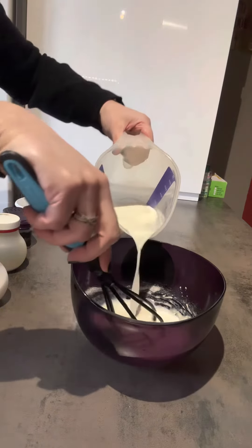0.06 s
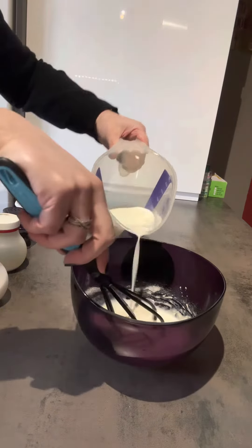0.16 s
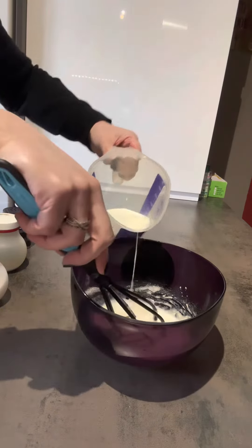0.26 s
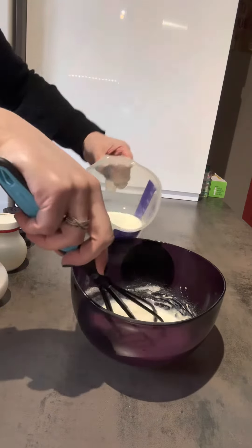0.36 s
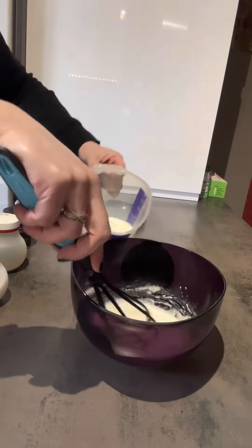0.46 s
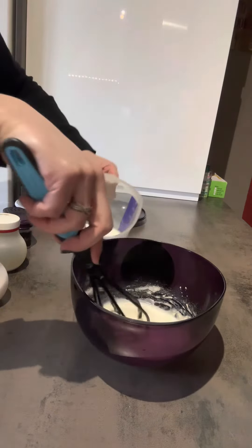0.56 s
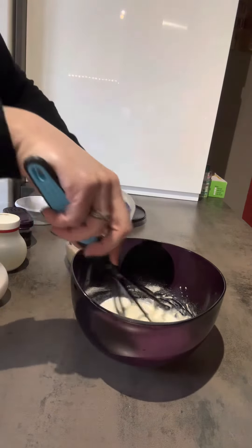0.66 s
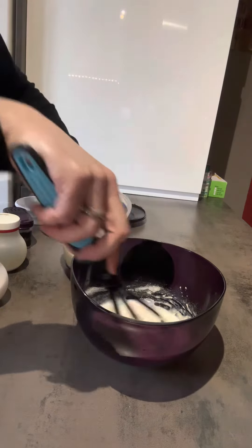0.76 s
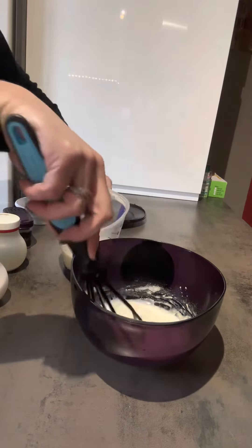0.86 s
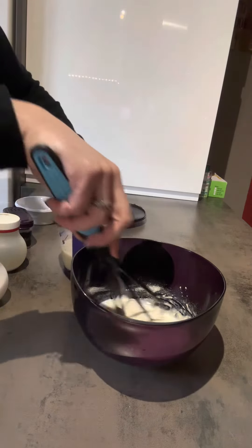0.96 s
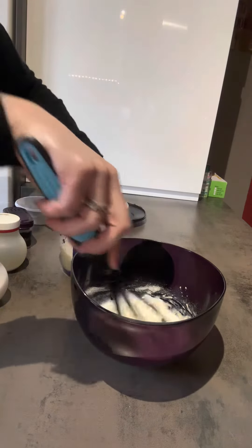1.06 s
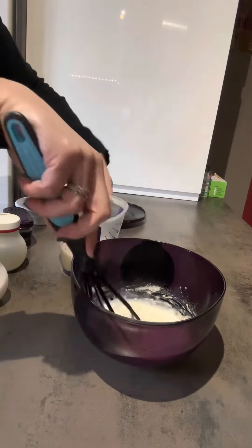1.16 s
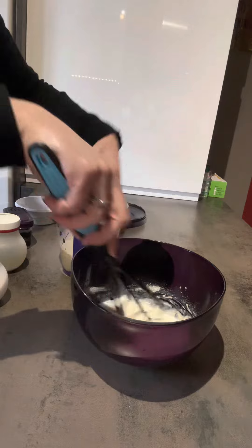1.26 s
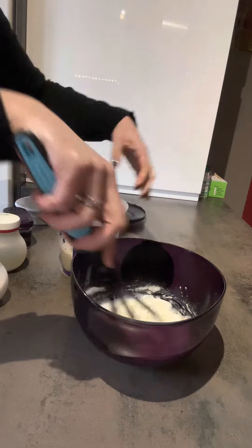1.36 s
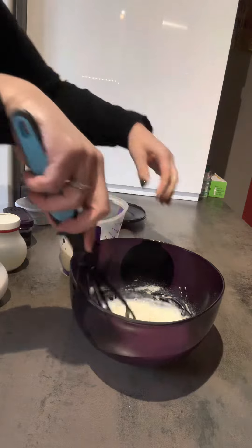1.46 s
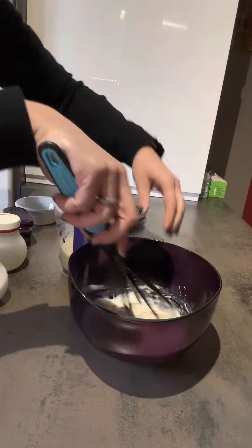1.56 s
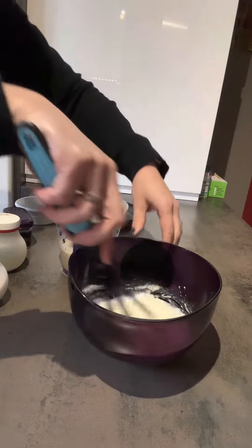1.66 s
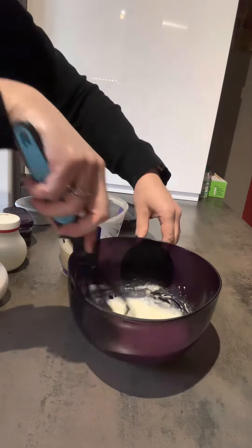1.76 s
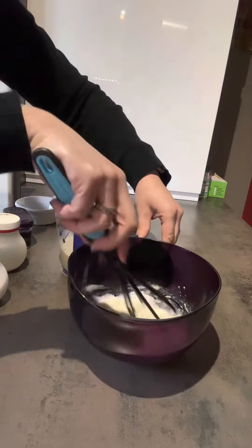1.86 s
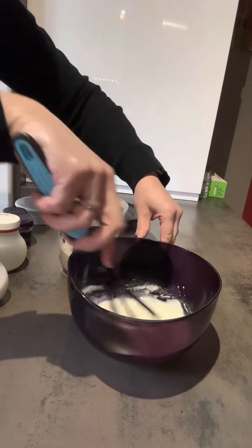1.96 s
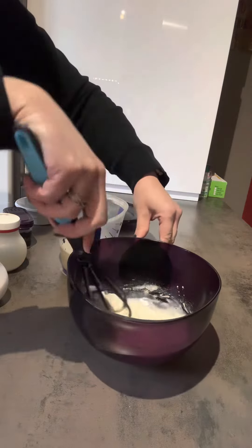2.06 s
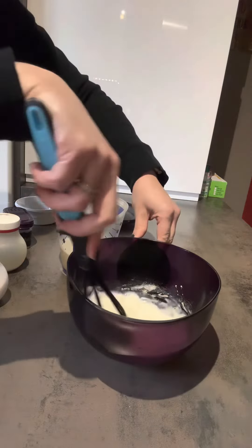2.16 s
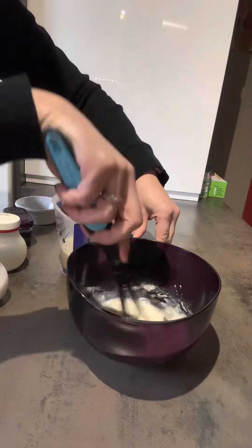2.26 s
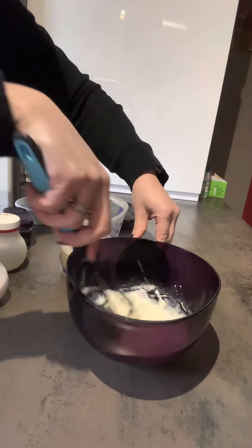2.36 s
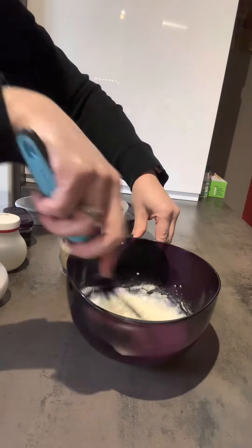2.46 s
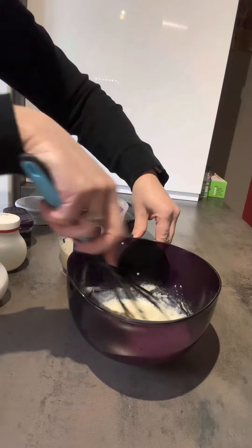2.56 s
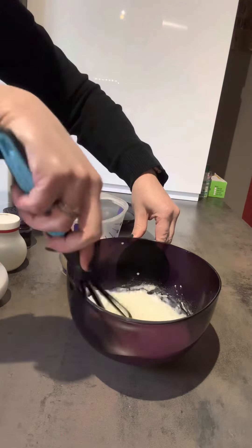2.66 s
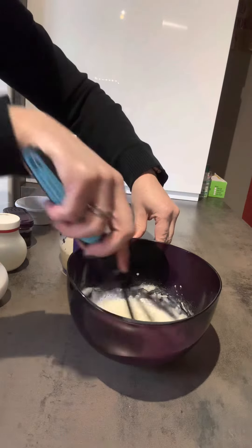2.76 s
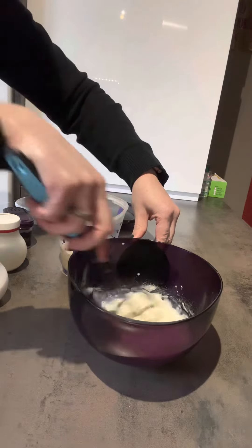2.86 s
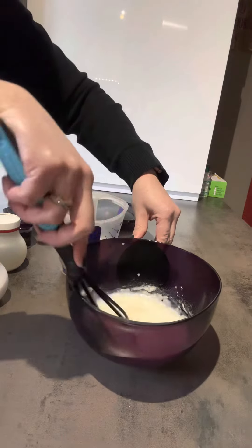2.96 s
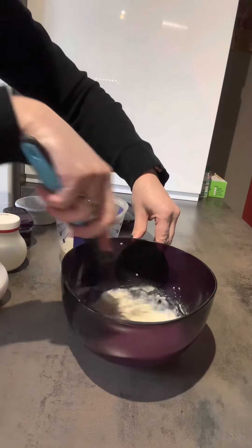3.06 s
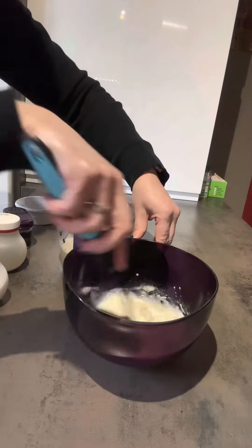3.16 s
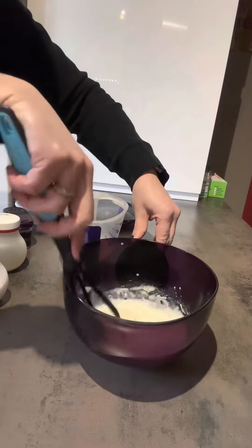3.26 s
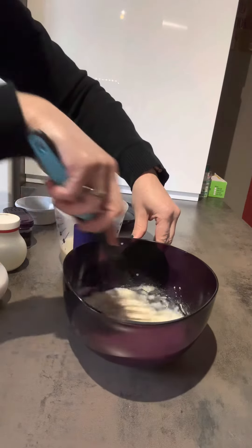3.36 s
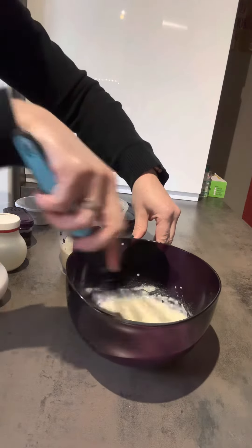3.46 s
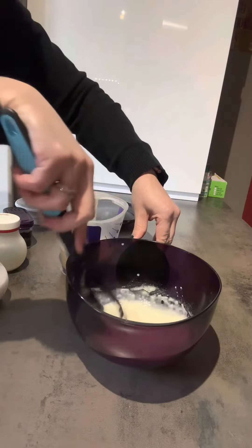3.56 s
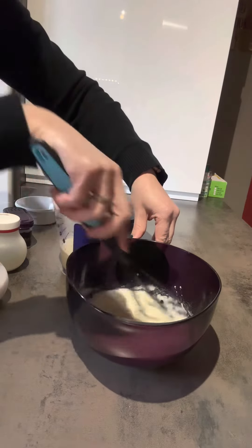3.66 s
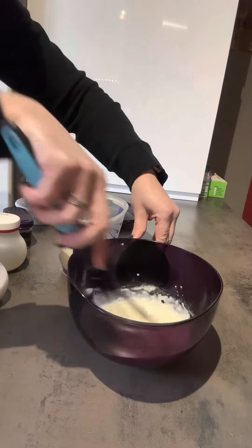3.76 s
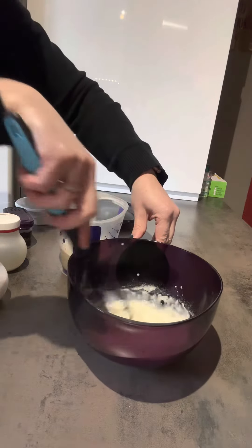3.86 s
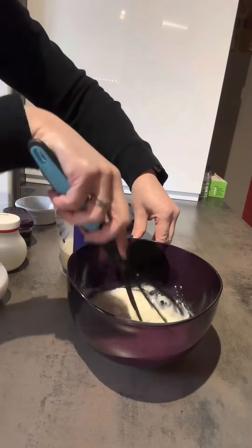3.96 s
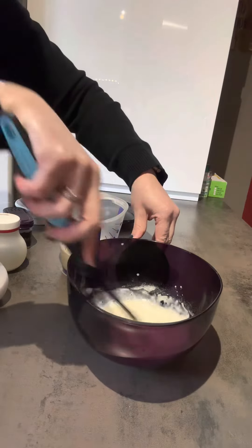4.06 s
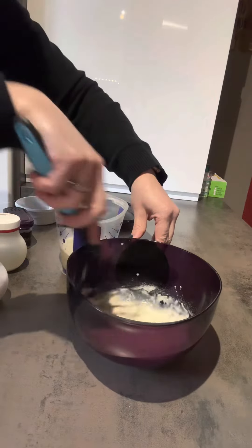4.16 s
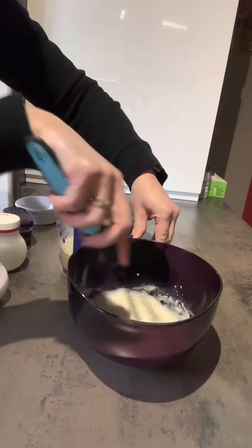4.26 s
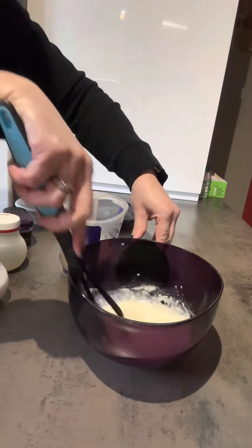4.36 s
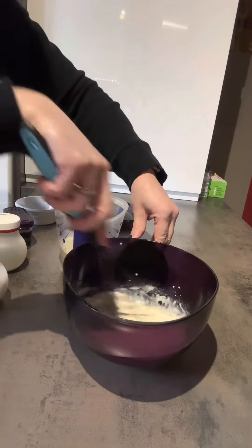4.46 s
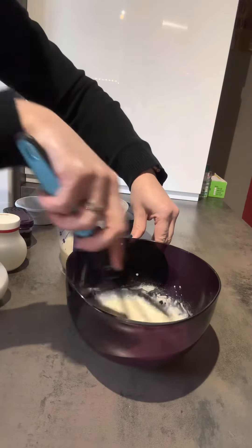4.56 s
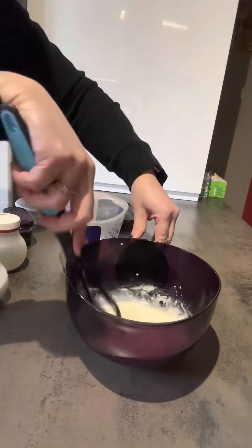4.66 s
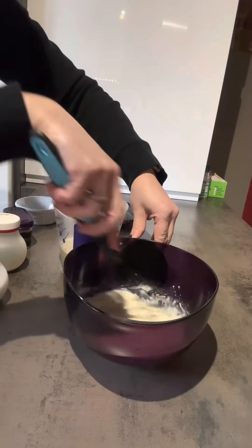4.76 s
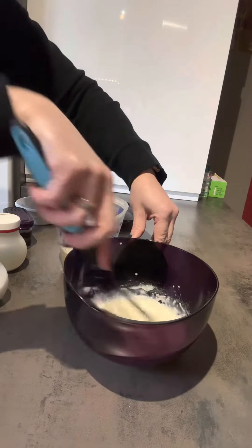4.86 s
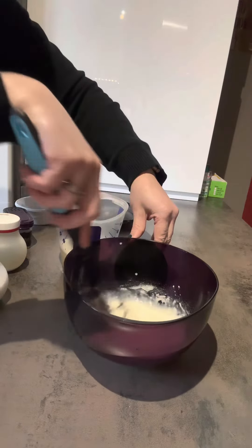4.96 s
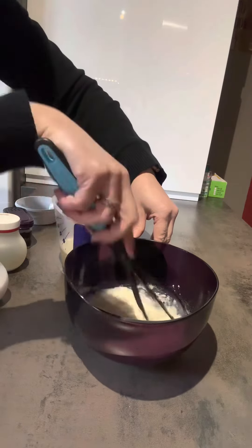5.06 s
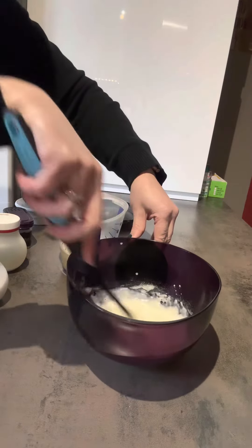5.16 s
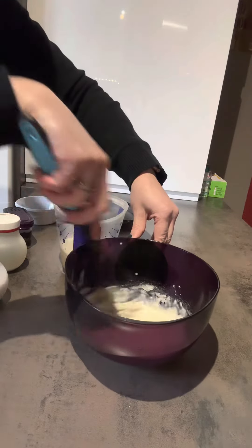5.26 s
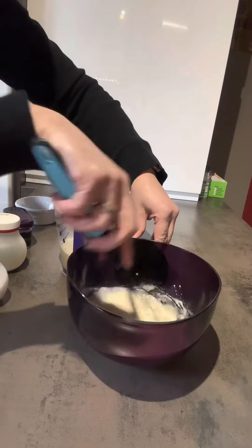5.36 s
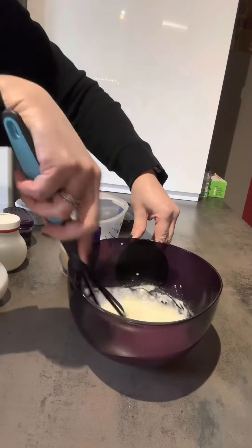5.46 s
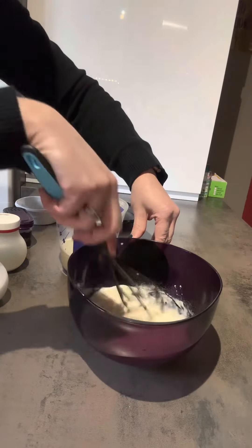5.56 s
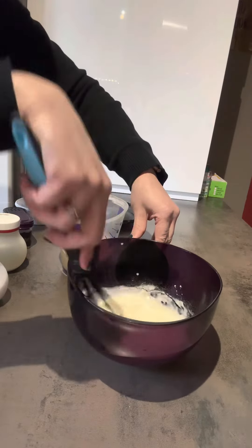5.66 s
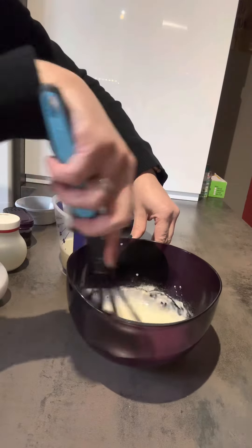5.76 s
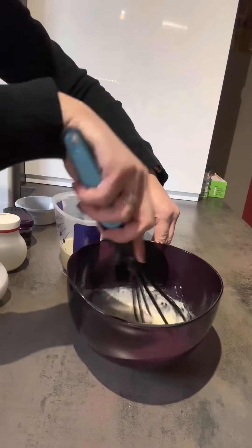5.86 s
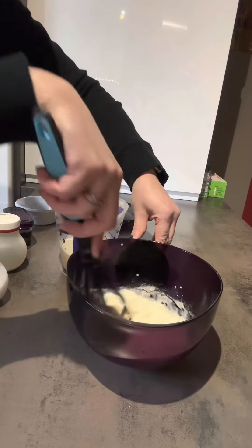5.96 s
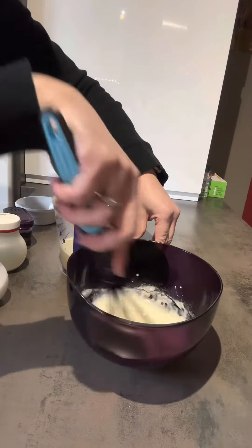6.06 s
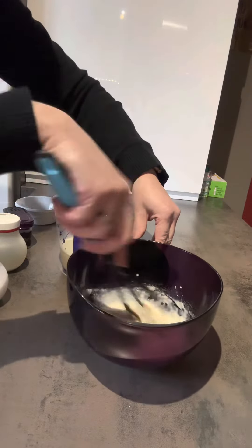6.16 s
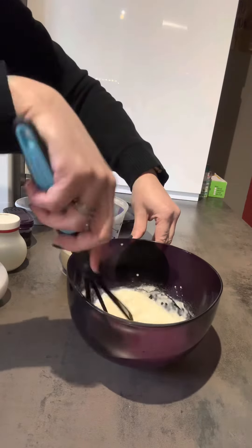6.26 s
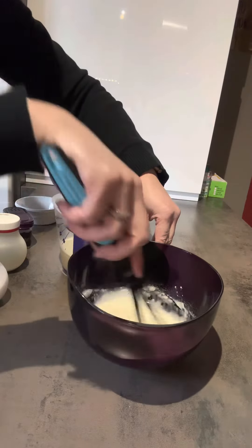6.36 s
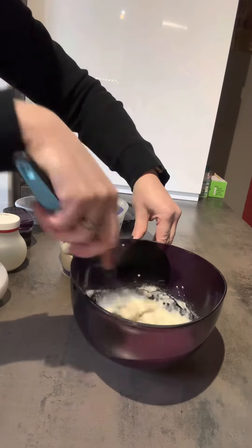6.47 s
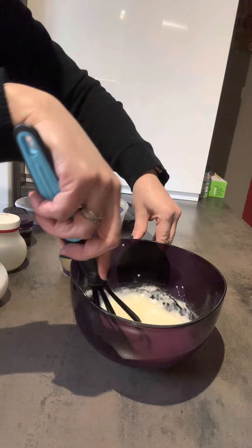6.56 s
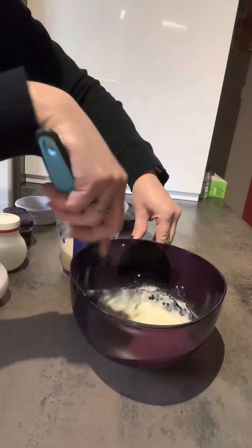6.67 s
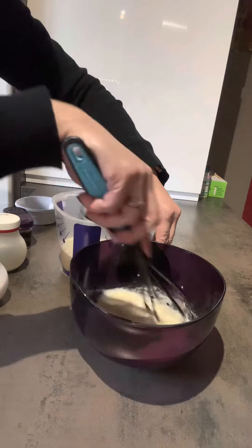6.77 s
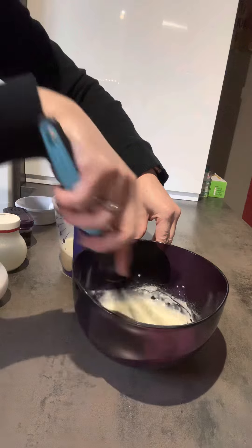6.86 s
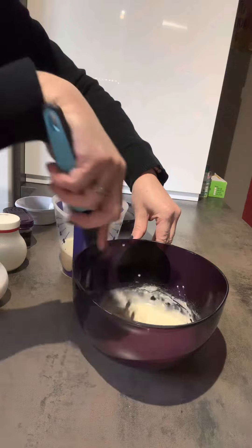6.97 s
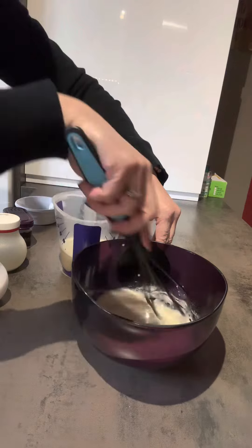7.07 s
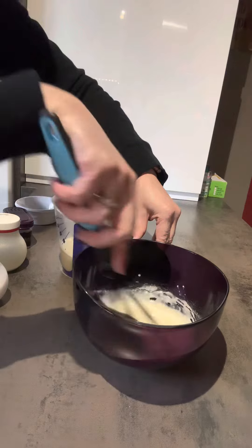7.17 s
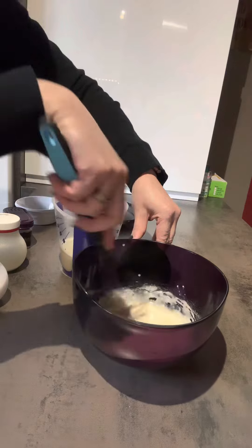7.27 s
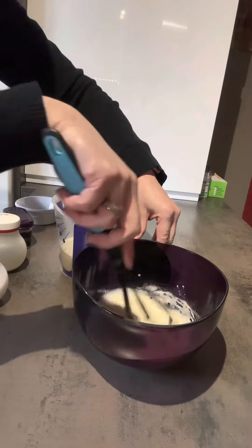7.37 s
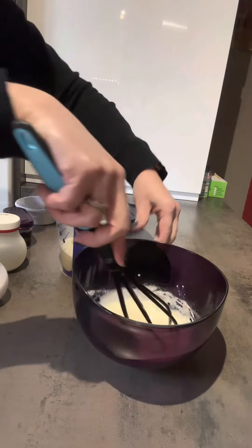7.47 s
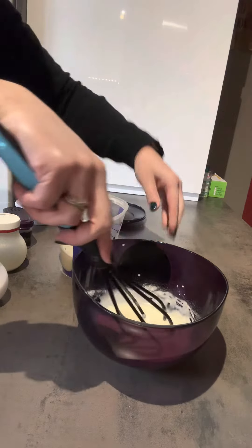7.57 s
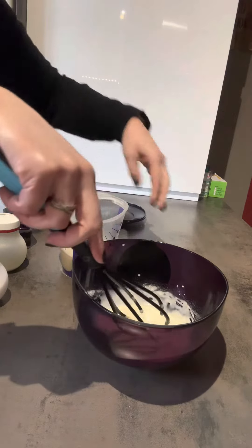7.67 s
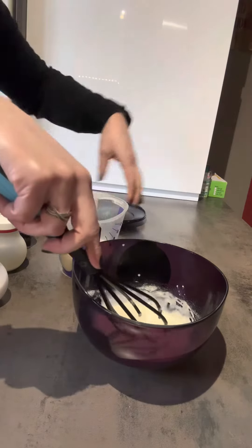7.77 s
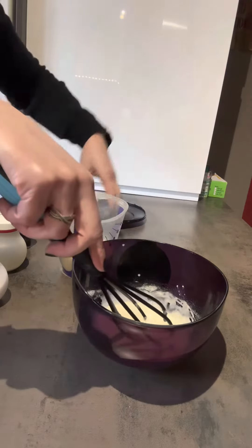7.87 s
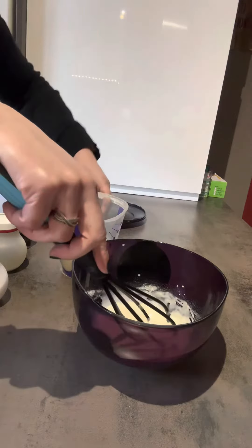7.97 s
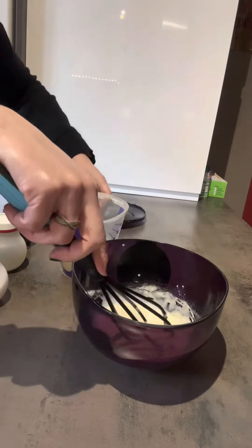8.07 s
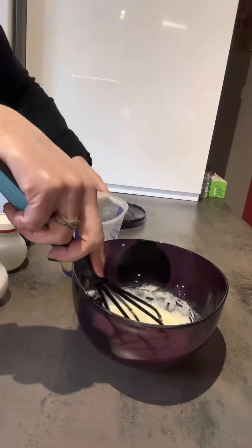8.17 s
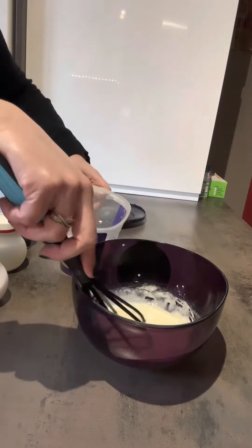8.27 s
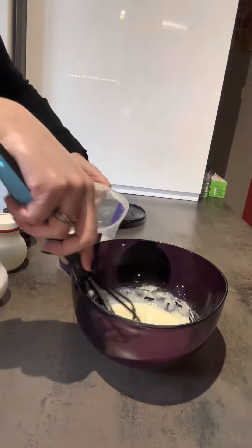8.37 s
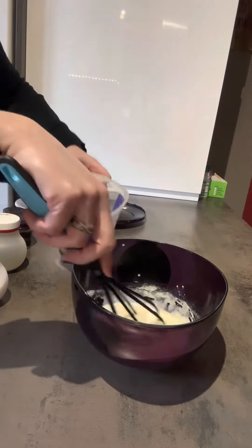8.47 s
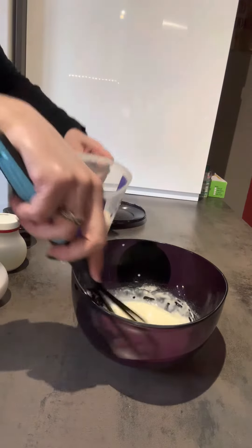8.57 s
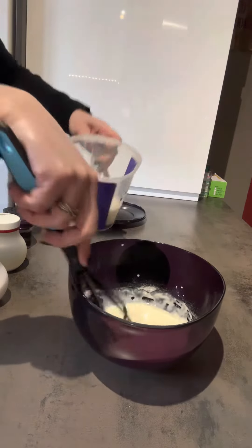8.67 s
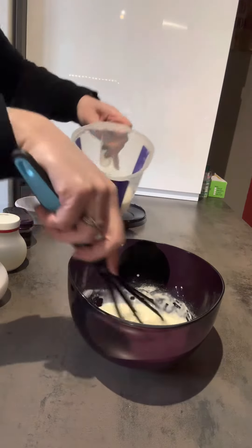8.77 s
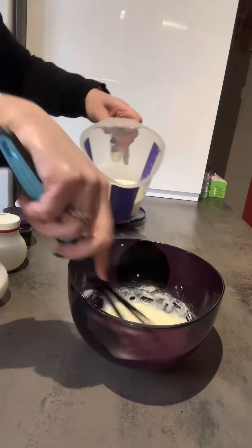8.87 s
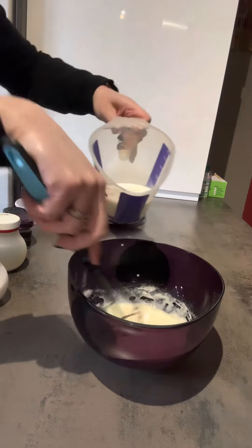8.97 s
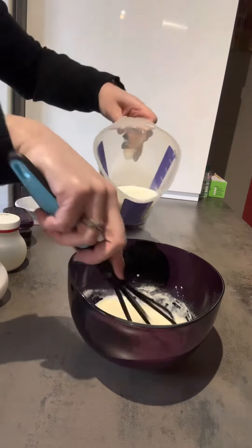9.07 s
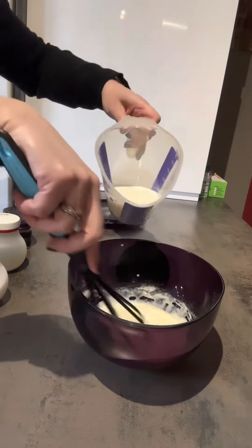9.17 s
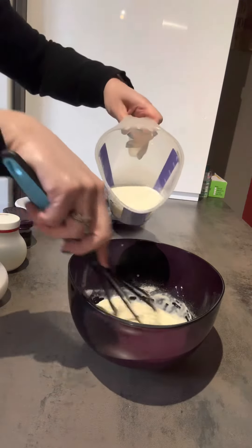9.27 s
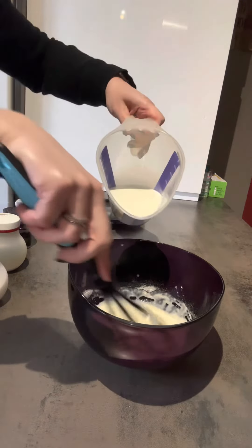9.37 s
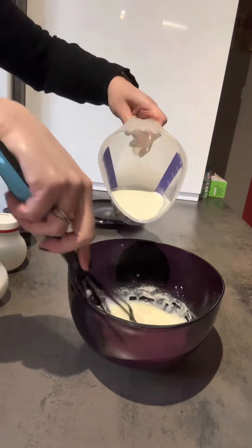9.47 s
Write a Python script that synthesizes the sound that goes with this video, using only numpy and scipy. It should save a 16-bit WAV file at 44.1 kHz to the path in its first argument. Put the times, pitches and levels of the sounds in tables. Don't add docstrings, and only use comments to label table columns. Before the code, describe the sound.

A close stereo microphone hears a wire whisk stirring cream in a plastic bowl. First a jug is put down, knocking twice, the second knock loudest. Slow light scraping turns into brisk rhythmic swishes with short squeaky metallic tones, hiss and dull bumps. After a short pause the jug scrapes and clacks away and gentle stirring resumes, over low fridge hum and a short room tail.

```python
import sys
import numpy as np
from scipy import signal
from scipy.fft import rfft, irfft, next_fast_len
from scipy.io import wavfile
from scipy.ndimage import uniform_filter1d

SR = 44100
rng = np.random.default_rng(int(sys.argv[2]) if len(sys.argv) > 2 else 0)


def convert_level_to_amplitude(level_db):
    exponent = np.asarray(level_db, float) / 20
    return 10 ** exponent


def master(y):
    cut = np.clip(np.atleast_2d(y).T, -1, 1)
    pcm = np.round(cut * 32767)
    wavfile.write(sys.argv[1], SR, pcm.astype(np.int16))


N = 420273


def evened(x):
    return x / np.sqrt(np.mean(x ** 2) + 1e-20)


def read(points, hz):
    f, value = np.transpose(points)
    return np.interp(np.log(hz + 1), np.log(f + 1), value)


def add(mix, s, sound):
    part = mix[round(s * SR):][:len(sound)]
    part += sound[:len(part)]


def through(x, response):
    length = x.shape[-1]
    size = next_fast_len(2 * length if length < SR else length + SR)
    return irfft(rfft(x, size) * response(np.fft.rfftfreq(size, 1 / SR)), size)[..., :length]


def coloured(x, points):
    return through(x, lambda hz: convert_level_to_amplitude(read(points, hz)))


def peak(hz, centre_hz, width):
    return 1 / (1 + 2j * (hz - centre_hz) / width)


def ring(x, modes):
    return through(x, lambda hz: sum(convert_level_to_amplitude(db) * peak(hz, f, width) for f, width, db in modes))


def wander(per_s, t, count=1):
    knots = rng.standard_normal((count, int(N / SR * 400) + 2))
    knots = evened(signal.filtfilt(*signal.butter(1, np.clip(per_s / 200, .001, .9)), knots))
    return np.array([np.interp(t * 400, np.arange(len(k)), k) for k in np.clip(knots, -2.2, 2.2)])


def slips(per_s, spread_db):
    happens, luck, sign = rng.random((N, 2, 3)).T
    size = convert_level_to_amplitude(-spread_db * np.log(1 - .99 * luck)) * np.sign(sign - .5)
    return evened(size * (happens < per_s / SR))


def moving_ring(x, modes, drift, flare_db, per_s, top_hz):
    hz, t, z = signal.stft(x, SR, nperseg=1024, noverlap=768)
    pitch = 1 + drift * wander(per_s, t, count=len(modes))
    flare = wander(per_s, t, count=len(modes))
    low, gain = hz[hz < top_hz, None], np.zeros(z.shape[1:], complex)
    gain[:len(low)] = sum((-1) ** k * convert_level_to_amplitude(db + flare_db * flare[k]) * peak(low, f * pitch[k], width)
                          for k, (f, width, db) in enumerate(modes))
    return evened(signal.istft(z * gain, SR, nperseg=1024, noverlap=768)[1][..., :N])


def patchy(x, flare_db, per_s, count):
    hz, t, z = signal.stft(x, SR, nperseg=1024, noverlap=768)
    centres = np.geomspace(2400, 17000, count)
    bands = (-1.) ** np.arange(count) * peak(hz[:, None], centres, .16 * centres)
    gain = bands @ convert_level_to_amplitude(flare_db * wander(per_s, t, count=count))
    return evened(signal.istft(z * gain, SR, nperseg=1024, noverlap=768)[1][..., :N])


# time in seconds, wire ring in dB.
DRAG = [(0.0, -71), (0.13, -111), (0.3, -98), (0.55, -64), (0.6, -55.5), (1.3, -50.5), (2.1, -47),
        (2.4, -40), (4.0, -41), (4.4, -40), (5.7, -39.5), (7.24, -36), (7.45, -66.5), (7.6, -102),
        (8.08, -93.5), (8.3, -61), (8.7, -44), (9.53, -48)]
# time of full pressure in seconds, ring in dB, hiss in dB re ring, length in seconds.
SWEEPS = [(2.266, -35, -14.5, 0.038), (2.524, -31.5, -34.5, 0.018), (2.725, -37.5, -14.5, 0.12),
          (2.993, -33, -5.5, 0.055), (3.08, -36.5, -14, 0.045), (3.33, -35.5, -8, 0.18),
          (3.605, -36, -9.5, 0.24), (3.843, -37, -7.5, 0.066), (4.163, -32.5, -9.5, 0.17),
          (4.395, -32.5, -13, 0.18), (4.602, -37.5, -7.5, 0.087), (4.698, -36, -10, 0.099),
          (4.937, -44, 5.5, 0.068), (5.005, -37.5, -9.5, 0.23), (5.203, -37, -3.5, 0.078),
          (5.277, -32, -7, 0.072), (5.474, -35, -3.5, 0.085), (5.546, -34, -10.5, 0.025),
          (5.672, -34.5, -20, 0.093), (5.86, -37.5, -8.5, 0.24), (6.119, -31, -6, 0.021),
          (6.243, -40.5, -7.5, 0.19), (6.376, -34.5, -9.5, 0.1), (6.614, -35, -4.5, 0.046),
          (6.727, -33.5, -6, 0.0726), (6.933, -43.5, 10.5, 0.033), (7.017, -41, 0.5, 0.15),
          (7.21, -32.5, -5, 0.052), (7.334, -45.5, -7, 0.076)]
LAZY = [(0.238, -75, 3, 0.035), (0.75, -50, -13, 0.079), (0.85, -51.5, -10.5, 0.14),
        (1.027, -50, -14, 0.11), (1.148, -44, -11, 0.064), (1.406, -45, -16, 0.2), (1.455, -53, -5, 0.031),
        (1.733, -44, -11, 0.064), (1.81, -46, -15.5, 0.11), (1.977, -35, -12.5, 0.058),
        (8.49, -46, -15, .08), (8.61, -44.5, -13, 0.11), (8.81, -47, -26, 0.3),
        (8.906, -36.5, -14.5, 0.044), (8.997, -40, -20, 0.04), (9.155, -39.5, -14, 0.052),
        (9.277, -40.5, -21, 0.063), (9.419, -40.5, -16, 0.079)]
# time in seconds, depth in dB.
SKIPS = [(0.8, -11.5), (1.92, -5.5), (2.865, -4.5), (3.79, -0.5), (4.753, -5.5), (5.74, -9), (6.536, -21),
         (7.298, -11), (8.68, -7)]


def pressure():
    lean, skip_s = 0.99, 0.031
    t = np.arange(0, N / SR + .002, .001)
    drag_db = np.interp(t, *np.transpose(DRAG))
    ring_gain = convert_level_to_amplitude(drag_db)
    hiss_gain = convert_level_to_amplitude(drag_db - 10.5 + 0.25 * (drag_db + 34))
    for s, db, hiss_db, length in SWEEPS + LAZY:
        sweep = convert_level_to_amplitude(db) * np.exp(-((t - s) / (.5 * length * np.where(t > s, lean, 1))) ** 2)
        ring_gain = np.hypot(ring_gain, sweep)
        hiss_gain = np.hypot(hiss_gain, sweep * convert_level_to_amplitude(hiss_db))
    clear = convert_level_to_amplitude(sum(db * np.exp(-((t - s) / skip_s) ** 2) for s, db in SKIPS))
    return (np.interp(np.arange(N) / SR, t, clear * gain) for gain in (ring_gain, hiss_gain))


# time in seconds, peak in dB.
CATCHES = [(2.885, -8), (4.289, -19.5), (5.632, -23), (6.11, -24), (6.603, -14.5), (6.691, -8),
           (6.9236, -26), (7.316, -15.5)]
# frequency in Hz, width in Hz, level in dB.
WIRES = [(1866, 177, -8), (2151, 130, 2.5), (2235, 75.4, 5.5), (2407, 34.7, 9), (2470, 133, 0),
         (2965, 510, -11), (3344, 115, -2.5), (3556, 294, -5.5), (3727, 207, -7), (4670, 220, -11.5),
         (6150, 240, -14)]
BOWL = [(313, 24, -2), (551, 76, -1.5), (670, 76, 2), (715, 83, -5), (1215, 142, -2), (1357, 138, 0.5),
        (1534, 124, -1.5)]
# frequency in Hz, level in dB per Hz.
HISS = [(1800, -16.5), (4000, -1), (4800, 2), (7200, -3.5), (8000, -3.5), (12000, -12), (14100, -15.5),
        (16000, -14)]


def whisk():
    t = np.arange(N) / SR
    moving = np.interp(t, [7.6, 7.62, 8.03, 8.05], [1, 0, 0, 1])
    ring_gain, hiss_gain = pressure()
    ring_db = 20 * np.log10(ring_gain)
    body_db = -52.5 + 0.1037 * (ring_db + 44.5)
    skid, u = np.zeros(N), np.arange(0, .08, 1 / SR)
    for s, db in CATCHES:
        add(skid, s - .002, convert_level_to_amplitude(db - 11.0) * (1 - np.exp(-u / 0.0027)) * np.exp(-u / 0.0048))
    judder_db = np.clip(1.4 * wander(45, t), -3, 2.2)
    press = moving * (1 + skid / ring_gain) * convert_level_to_amplitude(judder_db)
    rub = slips(6000, 1.73)
    wires = moving_ring(rub, WIRES, 0.009, flare_db=2.2, per_s=30, top_hz=7000)
    grains = patchy(rub + slips(4000, 3.2), flare_db=2.8, per_s=30, count=24)
    grains = grains + .6 * rub[::-1, ::-1]
    hiss = evened(coloured(grains, HISS))
    wall = moving_ring(rub[:, ::-1], BOWL, 0.0065, flare_db=4.5, per_s=14, top_hz=3500)
    scrape = press * (wires * ring_gain * convert_level_to_amplitude(-0.5) + hiss * hiss_gain * convert_level_to_amplitude(1.5))
    wall_db = np.minimum(body_db, ring_db - 3.5) - 0.5 + 0.37 * judder_db
    return scrape + wall * moving * convert_level_to_amplitude(wall_db)


# time in seconds, peak in dB, frequency in Hz, length in seconds.
SONGS = [(1.465, -35, 2325, 0.044), (1.937, -42, 2390, 0.055), (2.256, -48, 2390, 0.035),
         (2.801, -44.5, 2210, 0.06), (2.897, -25, 2524, 0.024), (2.9855, -33, 2210, 0.071),
         (3.062, -29, 2265, 0.06), (3.219, -59, 2470, 0.06), (3.327, -20.5, 2233, 0.071),
         (3.414, -30, 2357, 0.072), (3.581, -24.5, 2227, 0.067), (3.6495, -33, 2470, 0.1),
         (3.8186, -31, 2500, 0.04), (3.99, -32.5, 2320, 0.06), (4.067, -45, 2400, 0.055),
         (4.13, -46, 2330, 0.06), (4.208, -27.5, 2215, 0.064), (4.291, -24.5, 2340, 0.037),
         (4.3908, -39, 2190, 0.056), (4.454, -29, 2100, 0.041), (4.584, -24.5, 2340, 0.039),
         (4.679, -39, 2200, 0.1), (4.864, -33.5, 2540, 0.072), (4.935, -29.5, 2330, 0.1),
         (5.044, -24, 2420, 0.032), (5.1137, -26.5, 2470, 0.043), (5.175, -26, 2470, 0.038),
         (5.27, -27, 2318, 0.11), (5.4406, -34.5, 2460, 0.1), (5.54, -40.5, 2330, 0.058),
         (5.649, -29, 2273, 0.1), (5.758, -31, 2390, 0.14), (5.854, -36, 2330, 0.056),
         (5.9872, -34, 2110, 0.033), (6.092, -25, 2326, 0.075), (6.2132, -26, 2424, 0.038),
         (6.293, -42, 2400, 0.054), (6.374, -30.5, 2176, 0.1), (6.562, -31.5, 2393, 0.073),
         (6.699, -23, 2210, 0.055), (6.828, -38, 2400, 0.074), (6.929, -30.5, 2280, 0.049),
         (7.002, -23, 2310, 0.16), (7.072, -27, 2295, 0.05), (7.168, -24, 2394, 0.037),
         (7.416, -54, 2320, 0.063),
         (2.9, -44, 3570, 0.021), (3.586, -24.5, 3540, 0.049), (6.93, -27.5, 3560, .09),
              (3.724, -37, 3450, 0.039), (4, -33.5, 3460, 0.041), (4.708, -29.5, 3490, 0.033),
              (5.188, -29, 3620, 0.039), (5.459, -27, 3550, 0.071), (6.117, -30, 3610, 0.031),
              (6.425, -30, 3450, 0.023), (6.605, -28, 3465, 0.054), (7.19, -30.5, 3487, 0.079),
         (8.3815, -43, 2406, 0.082), (8.539, -36, 2500, 0.1), (8.708, -36, 2330, 0.049),
              (8.8961, -40, 2140, 0.082), (8.9734, -35, 2296, 0.077), (9.0617, -36, 2376, 0.092),
              (9.1532, -37, 2300, 0.052), (9.2283, -30, 2306, 0.048), (9.3965, -37, 2350, 0.08),
              (9.5112, -34, 2200, 0.08)]


def songs():
    width_hz, level_db = 93, -12
    out, rows = np.zeros((2, N)), SONGS
    for (s, db, hz, length), grit in zip(rows, rng.standard_normal((len(rows), 2, 8192))):
        u = np.arange(8192) / SR / np.clip(length, .02, .09)
        tone = evened(through(grit, lambda f: peak(f, hz, width_hz) ** 2))
        tone = evened(tone / np.sqrt(abs(signal.hilbert(tone)) + .2))
        swell = 3 * u * np.exp(1 - 3 * u ** 1.5)
        add(out.T, s - .01, (convert_level_to_amplitude(db + level_db) * tone * swell).T)
    return out


# time in seconds, peak in dB, frequency in Hz, t60 in seconds.
TAPS = [(.221, -52.5, 2660, 0.098), (1.992, -39, 596, 0.036), (2.204, -40, 560, 0.11),
        (2.427, -49, 577, 0.11), (2.525, -46, 618, 0.11), (3.077, -42, 530, 0.088),
        (3.352, -46.5, 625, 0.16), (3.519, -41, 690, 0.062), (3.638, -40, 526, 0.1),
        (4.191, -39, 517, 0.085), (4.396, -37, 640, 0.089), (5.018, -40, 476, 0.098),
        (5.049, -41, 542, 0.12), (5.245, -44.5, 660, 0.068), (5.442, -41, 693, 0.053),
        (5.493, -44, 695, 0.11), (5.547, -43, 583, 0.067), (5.852, -43.5, 534, 0.11),
        (6.12, -33, 520, 0.047), (6.376, -37.5, 528, 0.1), (6.608, -42, 612, 0.1),
        (7.043, -40.5, 537, 0.055)]


def taps():
    out, t = np.zeros(N), np.arange(0, .2, 1 / SR)
    for s, db, hz, t60 in TAPS:
        turn = 2 * np.pi * hz * t
        modes = np.sin(turn) + 0.46 * np.sin(0.81 * turn) + 0.43 * np.sin(0.95 * turn)
        add(out, s, convert_level_to_amplitude(db - 60 * t / max(t60, .03)) * (1 - np.exp(-t / 0.0031)) * modes)
    return out


# time in seconds, peak in dB, length in seconds, starting sag of pitch from 0 to 1.
ROCKS = [(0.638, -25, 0.023, 0.3), (0.703, -46.5, 0.12, 0.68), (1.034, -38, 0.07, 0.24),
         (2.3, -50, 0.071, 0.2), (2.531, -53, 0.069, 0.43), (2.752, -44.5, 0.12, 0.8),
         (2.893, -47, 0.064, 0.3), (3.067, -42.5, 0.081, 0.26), (3.375, -41.5, 0.12, 0.12),
         (3.641, -44.5, 0.084, 0.64), (4.198, -37.5, 0.11, 0.34), (4.472, -45, 0.089, 0.45),
         (4.765, -47, 0.082, 0.5), (5.012, -42.5, 0.14, 0.6), (5.281, -43.5, 0.099, 0.45),
         (5.328, -43, 0.13, 0.08), (5.65, -38.5, 0.088, 0.1), (5.874, -42, 0.054, 0.05),
         (6.126, -46, 0.086, 0.27), (6.375, -42, 0.098, 0.26), (6.617, -50, 0.051, 0),
         (6.719, -40, 0.12, 0.07), (7.055, -43, 0.085, 0.45), (7.323, -47.5, 0.085, 0.12),
         (8.237, -40, 0.11, 0.25), (8.534, -37.5, 0.12, 0.5)]


def rocking():
    seated_hz = 143
    out = np.zeros(N)
    for s, db, length, sag in ROCKS:
        t = np.arange(0, 1.6 * length, 1 / SR)
        turn = 2 * np.pi * np.cumsum(seated_hz * (1 - sag * np.exp(-t / 0.0265))) / SR
        u = 3.3 * t / length
        rough = 1 + .35 * evened(uniform_filter1d(rng.standard_normal(SR // 2), 500))[:len(t)]
        swell = rough * u * np.exp(1 - u) * signal.windows.tukey(len(t), .3)
        add(out, s - .01, convert_level_to_amplitude(db) * swell * (np.sin(turn) + convert_level_to_amplitude(-11) * np.sin(2.03 * turn)))
    return out


def strike(t, modes, crack_db, free, rise):
    free_loss = .35
    chance, grit = rng.standard_normal((2, len(t)))
    split = rng.standard_normal((len(modes), 2, 2))
    onset = 1 - np.exp(-t / max(rise, .0003))
    age = t - (1 - free_loss) * np.minimum(t, free)
    tones = 0
    for k, ((hz, db, t60), pair) in enumerate(zip(modes, split)):
        near = sum(np.sin(2 * np.pi * hz * (1 + 0.05 * off) * t + turn) for off, turn in pair)
        tone = (-1) ** k * np.sin(2 * np.pi * hz * t) + 0.35 * np.clip(hz / 1200, .4, 1) * near
        build = 1 - np.exp(-t * hz / 1.12)
        tones += convert_level_to_amplitude(db - 60 * age / t60) * build * tone
    bounces = (t == 0) + 0.04 * chance * (abs(chance) > 2.6) * np.exp(-t / 0.006)
    body = signal.fftconvolve(bounces, tones * onset)[:len(t)]
    body *= convert_level_to_amplitude(-8.5 / (1 + np.exp(-(t - free) / 0.00033)))
    crack = .6 * convert_level_to_amplitude(crack_db) * grit * np.exp(-t / .0016)
    dull = signal.sosfilt(signal.butter(2, [170, 3000], "band", fs=SR, output="sos"), chance)
    blurred = [(hz, 0.4 * hz, db - 4 * np.log2(hz / 500)) for hz, db, _ in modes]
    fade = np.exp(-t / (0.0064 + 2 * rise)) + 0.18 * np.exp(-t / 0.082)
    clack = evened(ring(dull, blurred)) * fade * onset
    return body / abs(body).max() + crack + convert_level_to_amplitude(-10.5) * clack


# time in seconds, peak in dB, crack in dB re peak,
# free ring in seconds, rise in seconds.
KNOCKS = [
    [(0.5573, -22.5, -18, 0.0051, 0.00036)],
    [(.6175, -13.5, -56, 0.025, 0.0011), (.69, -33, -50, 0.069, 0.0074), (8.125, -38.5, -45, 0.034, 0.018),
     (8.188, -32.5, -30, 0.027, 0.008), (8.238, -28.5, -21.5, 0.038, 0.0023)],
    [(1.0365, -7.5, -44.5, 0.023, 0.00066), (1.107, -23.5, -40, 0.033, 0.003)],
    [(2.8848, -11, -13.5, 0.011, 0.0012), (7.3139, -40, 2, 0.016, .001)],
    [(4.322, -21.5, -18, 0.005, 0.0005)],
    [(5.634, -18, -10, 0.011, 0.0005), (5.65, -28, -28, 0.052, .003)],
    [(8.2138, -15.5, -15, 0.016, 0.0017)],
    [(8.528, -14.5, -12.5, 0.018, 0.0007), (8.553, -30.5, -27, 0.035, .002)],
]
# frequency in Hz, level in dB, t60 in seconds.
JUG_DOWN = [
    [(257, 2, 0.25), (403, 0, 0.093), (634, -1.5, 0.061), (1125, -10, 0.046), (1505, -10, 0.098),
     (2170, -8, 0.03)],
    [(268.4, 2.5, 0.3), (344, -8, .15), (434.7, -10.5, 0.13), (520.4, -11.5, 0.24), (644, -7.5, 0.11),
     (795, -10, .1), (1100, -48.5, .08), (1610, -28, .04)],
    [(273, -2, 0.12), (528, -11, 0.061), (654, 2, 0.064), (728, 5.5, 0.069), (792, 3.5, 0.25),
     (885, -1, 0.07), (1076, -9, 0.1), (1183, -14, .05), (1350, -14.5, 0.1), (1610, -20, 0.037),
     (2267, -15, 0.12)],
]
RIM_AND_LIFT = [
    [(304, -2, 0.1), (640, -7.5, 0.024), (729, -12, .06), (844, -2.5, 0.12), (1230, -11.5, 0.079),
     (1500, -3, .07), (1950, -0.5, 0.042), (2500, -6.5, 0.115), (2960, -27, 0.036), (3490, -10, 0.074)],
    [(184, -2, 0.11), (387, -0.5, 0.078), (965, -2.5, .03), (1130, -3.5, 0.022), (1421, -23, .05)],
    [(298, 1, 0.23), (333, 2.5, 0.048), (600, -2, 0.13), (870, -1, 0.026), (1170, -1, 0.046),
     (1200, 4, 0.035), (1873, 5, 0.021), (2470, -18, .06), (2700, -11, .05)],
    [(230, 3.5, 0.26), (530, 1.5, 0.12), (680, -11, 0.047), (810, 1.5, 0.11), (1130, -0.5, 0.067),
     (1250, -7, 0.083), (1510, -5, 0.043), (1890, -0.5, 0.14), (2112, -4, .06), (2514, 1.5, 0.089),
     (2950, -17, 0.068), (3300, -6, .1)],
    [(308, 2.5, 0.081), (710, 6.5, 0.02), (913, -8, 0.33), (1107, 1, 0.046), (1490, 6, 0.021),
     (1750, -4, 0.058), (2440, -2, 0.072), (2740, 1.5, 0.031)],
]
# time in seconds, peak in dB, length in seconds.
THUDS = [(0.633, -47, 0.31), (1.074, -56, 0.13), (2.908, -58, 0.36), (8.238, -52, 0.15), (8.547, -59, .12),
         (8.723, -57, 0.072)]


def knocks():
    jug, rim = out = np.zeros((2, N))
    t = np.arange(0, .36, 1 / SR)
    for index, (rows, modes) in enumerate(zip(KNOCKS, JUG_DOWN + RIM_AND_LIFT)):
        side = jug if index < len(JUG_DOWN) else rim
        for s, db, crack_db, free, rise in rows:
            add(side, s, convert_level_to_amplitude(db) * strike(t, modes, crack_db, free, rise))
    for s, db, length in THUDS:
        swell = np.sqrt(np.sin(np.pi * np.clip(t / length, 0, 1) ** .6) ** 2)
        add(rim, s, convert_level_to_amplitude(db) * np.sin(2 * np.pi * 52.6 * t) * swell)
    return out


# time of full pressure in seconds, level in dB, swell in seconds, release in seconds.
SLIDES = [(.01, -77, 0.0042, .04), (.46, -62.5, 0.24, 0.029), (.55, -55, .05, 0.056),
          (7.98, -71.5, 0.07, 0.072), (8.2, -59.5, 0.091, 0.085), (8.26, -46, 0.036, 0.039)]
# frequency in Hz, level in dB per Hz.
SLIDE = [(200, 3), (600, 1.5), (1500, -9.5), (2500, -11.5), (4000, -26), (9000, -33), (15000, -42)]


def slides():
    t = np.arange(N) / SR
    press = sum(convert_level_to_amplitude(db) * np.exp(-((t - s) / np.where(t > s, release, swell)) ** 2)
                for s, db, swell, release in SLIDES)
    return press * evened(coloured(slips(3000, 2.2), SLIDE))


# time in seconds, peak in dB, centre in Hz, width in Hz.
TICKS = [(.006, -53.5, 5030, 7000), (0.222, -51, 10000, 9000), (0.221, -48, 2540, 3020),
         (4.757, -58, 14100, 2000), (6.111, -47, 9000, 8000), (6.598, -38, 8860, 8000),
         (6.69, -45, 9190, 8070), (7.499, -47, 9870, 9090), (7.635, -61, 12560, 1996),
         (7.836, -57, 8760, 1200), (8.205, -60, 7900, 8100)]


def ticks():
    out, t = np.zeros(N), np.arange(0, .09, 1 / SR)
    puff = np.exp(-t / 0.00095) + 0.19 * np.exp(-t / 0.031)
    for (s, db, hz, width), grit in zip(TICKS, rng.standard_normal((len(TICKS), len(t)))):
        add(out, s, convert_level_to_amplitude(db + 1.5) * ring(grit * puff, [(hz, width, 0)]))
    return out


# frequency in Hz, t60 in seconds.
KITCHEN = [(100, 0.56), (500, 0.25), (2000, 0.25), (6000, 0.11), (14000, 0.017)]


def kitchen(x):
    hz, t, z = signal.stft(rng.standard_normal((2, SR // 2)), SR, nperseg=256)
    tail = signal.istft(z * convert_level_to_amplitude(-60 * t / read(KITCHEN, hz)[:, None]), SR, nperseg=256)[1]
    tail *= np.clip(np.arange(tail.shape[1]) / SR / 0.0017 - .4, 0, 1)
    return signal.fftconvolve(x[None], tail / np.linalg.norm(tail[0]), axes=1)[:, :N]


# frequency in Hz, width in Hz, level in dB.
HUM = [(49.1, 9.8, -72.5), (169, 25.5, -74.5), (139, 93, -79), (282, 30, -76.5), (311, 28, -70),
       (399, 33, -73)]
# frequency in Hz, level in dB per Hz.
AIR = [(18, -31.5), (40, -5), (62, -1.5), (90, -14.5), (167, 4.5), (400, -30), (900, -30.5), (15000, -55.5)]


def floor():
    hum_noise, air_noise = rng.standard_normal((N, 2, 2)).T
    hum = through(hum_noise, lambda f: sum(convert_level_to_amplitude(db) * peak(f, hz, width) ** 2 * np.sqrt(SR / width)
                                           for hz, width, db in HUM))
    air = coloured(air_noise, AIR)
    high = signal.sosfilt(signal.butter(4, 450, "high", fs=SR, output="sos"), air)
    mains = convert_level_to_amplitude(-62) * np.sin(2 * np.pi * 49.7 * np.arange(N) / SR)
    return mains + convert_level_to_amplitude(0.5) * hum + convert_level_to_amplitude(-80 + 2.0) * air / np.std(high)


# frequency in Hz, likeness from 0 to 1.
SAME = [(60, 0.79), (300, 1), (600, 0.34), (1400, 1), (2500, 0.1), (5000, 0.1), (9000, 0.65), (14000, 0.93)]
# frequency in Hz, radians by which the left leads.
LEAD = [(100, 0.1), (330, .9), (760, -0.9), (1150, .7), (2330, 1.9), (2930, 0.7), (4050, 0.6), (4820, -3.5),
        (5770, -3.7), (7920, -1.8), (9730, 0.0), (12700, 0.0), (13900, 2.5), (16000, 2.6)]
# frequency in Hz, left over right in dB.
LEFT_DB = [(60, 3.5), (180, -1.5), (550, 5.5), (1650, -1), (4970, -3), (15000, 1.5)]


def ports(x, other):
    same = lambda hz: np.clip(read(SAME, hz), 0, 1)
    tilt = lambda hz: convert_level_to_amplitude(read(LEFT_DB, hz) / 2)
    right = through(x, lambda hz: same(hz) * np.exp(-1j * read(LEAD, hz)) / tilt(hz))
    right += through(other, lambda hz: np.sqrt(1 - same(hz) ** 2) / tilt(hz))
    return np.array([through(x, tilt), right])


# frequency in Hz, radians by which the left leads.
JUG_LEAD = [(0, 0), (430, .5), (700, 1.3), (1120, 5.6), (1720, 8.5), (4000, 12)]


def scene():
    jug, rim = knocks()
    stir, scattered = whisk() + songs() + slides()
    air, other_air = floor()
    hits = rim + ticks() + taps()
    late = np.roll(hits, 60)
    knocks_sent = convert_level_to_amplitude(-6.0) * coloured(hits + jug, [(300, -5.5), (2000, -2.5)])
    room = kitchen(knocks_sent + convert_level_to_amplitude(-8.0) * stir)
    room[1] += coloured(room[0] - room[1], [(300, -5), (600, -40)])
    aside = np.array([jug, through(jug, lambda hz: np.exp(-1j * read(JUG_LEAD, hz)))])
    near = ports(hits + stir + air + rocking(), late + scattered + other_air)
    return near + aside + room


def band_limit(x):
    return signal.sosfilt(signal.butter(12, 16470, fs=SR, output="sos"), x)


def record(dry):
    heard = signal.sosfilt(signal.butter(8, [45, 16000], "band", fs=SR, output="sos"), dry)
    return band_limit(heard)


dry = scene()
out = record(dry)
master(out)
```